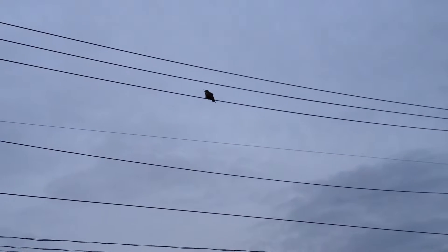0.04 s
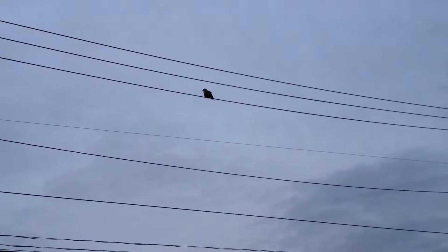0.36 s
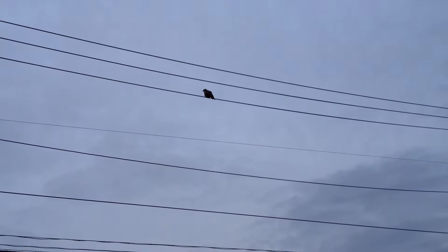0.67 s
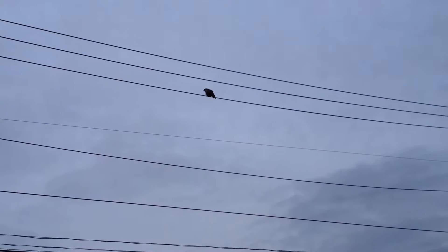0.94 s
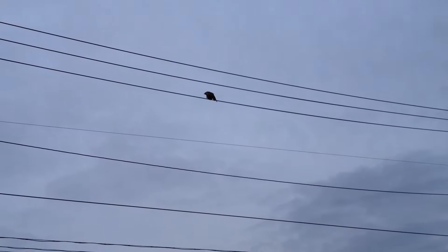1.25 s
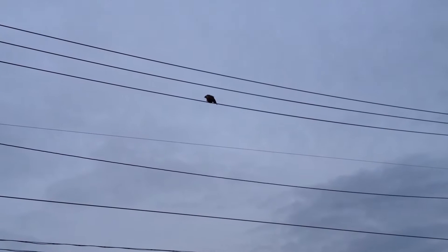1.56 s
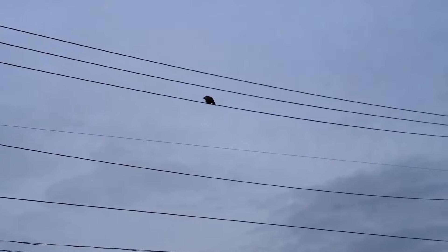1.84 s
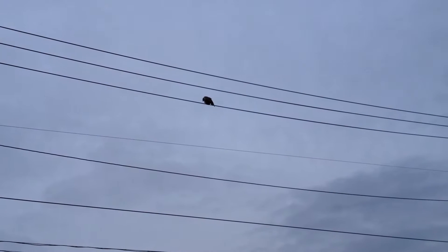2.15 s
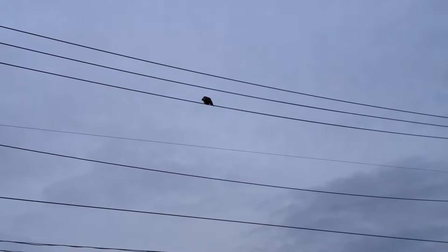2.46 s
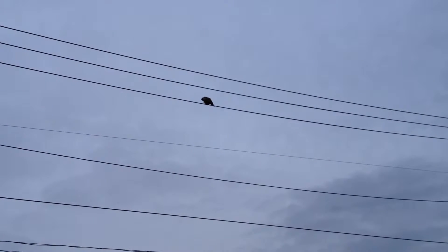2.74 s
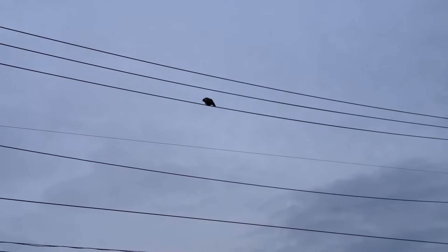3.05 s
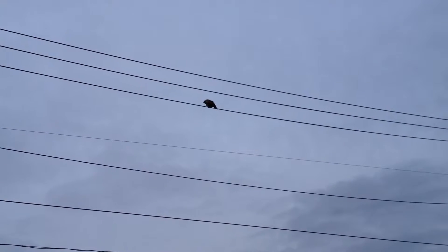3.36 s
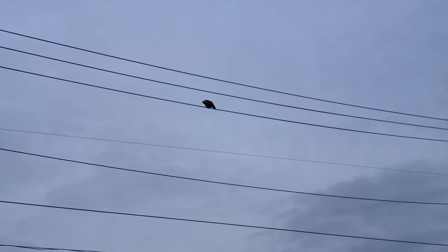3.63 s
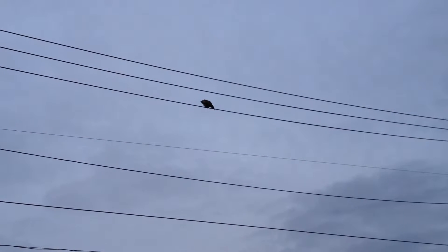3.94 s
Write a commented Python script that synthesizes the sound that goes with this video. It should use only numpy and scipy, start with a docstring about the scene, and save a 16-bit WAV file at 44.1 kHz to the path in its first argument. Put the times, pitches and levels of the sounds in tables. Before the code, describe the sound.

A bird on an overhead wire whistles one long, thin call: an arching slide, then a trill that quickens and fades. It echoes faintly outdoors over rushing traffic and a low engine hum, with two soft wind puffs near the end.

```python
"""Near a road, a bird on an overhead wire whistles one long call: a slide that arches up and down,
then a trill that quickens and fades. At some peaks of the trill its voice flips to a higher register.
The ground and walls echo it. Behind it is the rushing noise of traffic, with a low exhaust drone,
one engine that gently revs and eases off, and a faint tyre whine. Near the end come two soft puffs
of wind. The sound is mono."""
import sys
import numpy as np
from scipy import signal
from scipy.fft import rfft, irfft
from scipy.io import wavfile
from scipy.ndimage import uniform_filter1d

SR = 44100
rng = np.random.default_rng(int(sys.argv[2]) if len(sys.argv) > 2 else 0)


def log_audio(samples):
    """Write samples as a 16-bit WAV file to the path given in sys.argv[1]."""
    # one column per channel
    frames = np.atleast_2d(samples).T
    # limit to full scale, then quantise
    limited = np.clip(frames, -1, 1)
    pcm = np.round(limited * 32767).astype(np.int16)
    wavfile.write(sys.argv[1], SR, pcm)


N = 176400  # 4 seconds

# The six notes of the opening slide, each (time [s], pitch [Hz], level [dB])
CLIMB = [(.74, 2030, -48), (.765, 2165, -44), (.79, 2315, -39), (.813, 2425, -39.5)]
ARCH = [(.814, 2725, -38.5), (.845, 2775, -36.5), (.89, 2900, -37), (.96, 2948, -36), (.995, 2962, -37),
        (1.025, 2945, -34), (1.05, 2910, -35), (1.072, 2830, -35.5), (1.093, 2740, -36.5)]
DIP = [(1.096, 2690, -40), (1.12, 2642, -39.5), (1.139, 2660, -39)]
STEP_UP = [(1.149, 2738, -38.5), (1.192, 2748, -40)]
STEP_DOWN = [(1.195, 2645, -39), (1.231, 2635, -35.5)]
LOW_NOTE = [(1.232, 2220, -37), (1.27, 2220, -40), (1.315, 2245, -38), (1.335, 2262, -39),
            (1.36, 2210, -41), (1.385, 2140, -50)]

def bird_slide(t):
    """The bird's pitch climbs, leaps into a long arch and drops back in steps."""
    notes = [CLIMB, ARCH, DIP, STEP_UP, STEP_DOWN, LOW_NOTE]
    return sum(whistle(t, *curve(note, t)) * gate(t, note[0][0], note[-1][0]) for note in notes)


# Each swing of the trill, from a valley up to a peak
# (peak time [s], valley pitch [Hz], valley level [dB], peak pitch [Hz], peak level [dB])
TRILL_SWINGS = [(1.46, 2197, -49, 2310, -37.5), (1.596, 2205, -42, 2390, -38), (1.71, 2182, -50, 2525, -32),
                (1.827, 2233, -45, 2570, -34), (1.951, 2275, -41, 2580, -35.5),
                (2.053, 2293, -39, 2580, -34), (2.145, 2443, -34, 2545, -39),
                (2.225, 2480, -45, 2590, -37.5), (2.311, 2485, -34, 2535, -36.5),
                (2.394, 2412, -38, 2520, -35), (2.475, 2387, -43, 2526, -32), (2.549, 2420, -37, 2625, -33),
                (2.616, 2470, -45, 2590, -33.5), (2.684, 2464, -38, 2545, -35),
                (2.764, 2440, -36, 2480, -31.5), (2.857, 2405, -36, 2626, -32),
                (2.93, 2405, -39.5, 2520, -33.5), (2.996, 2410, -36, 2480, -36.5),
                (3.075, 2437, -44, 2605, -31.5), (3.13, 2464, -34.5, 2463, -35),
                (3.2, 2412, -36, 2455, -34.5), (3.267, 2403, -36, 2520, -36), (3.336, 2373, -37, 2520, -35),
                (3.397, 2374, -39, 2535, -35.5), (3.46, 2364, -41, 2470, -36.5),
                (3.524, 2324, -50, 2410, -32), (3.585, 2280, -59, 2370, -43), (3.646, 2283, -54, 2370, -42)]
# When the voice flips to its higher register (start [s], end [s])
VOICE_FLIPS = [(1.699, 1.748), (1.817, 1.863), (1.935, 1.986), (2.034, 2.079), (2.465, 2.495)]

def bird_trill(t):
    """Pitch and loudness swing back and forth; on some peaks the voice flips upward."""
    start_s, peak_sharpness = 1.39, 2.1
    flip_hz, flip_db = 481, -1.1
    peak_s, valley_hz, valley_db, peak_hz, peak_db = np.transpose(TRILL_SWINGS)
    valley_s = np.append(start_s, (peak_s[:-1] + peak_s[1:]) / 2)
    turns_s = np.column_stack([valley_s, peak_s]).ravel()
    step = np.interp(t, turns_s, np.arange(len(turns_s)))  # even at valleys, odd at peaks
    peak = (step // 2).astype(int)
    valley = np.minimum((step + 1) // 2, len(peak_s) - 1).astype(int)
    swing = np.sin(np.pi * step / 2) ** 2  # 0 at valleys, 1 at peaks
    hz = valley_hz[valley] + (peak_hz[peak] - valley_hz[valley]) * swing ** peak_sharpness
    gain = amp(valley_db[valley]) * (1 - swing) + amp(peak_db[peak]) * swing
    db = 20 * np.log10(gain)
    low_voice = whistle(t, hz, db)
    high_voice = whistle(t, hz + flip_hz + 20 * drift(207), db + flip_db)  # less steady in pitch
    flipped = sum(gate(t, start, end, edge_s=0.0011) for start, end in VOICE_FLIPS)
    voice = (1 - flipped) * low_voice + flipped * high_voice
    return voice * gate(t, start_s, peak_s[-1])


# Overtones at 2 and 3 times the pitch, compared with the main tone, before the throat shapes them
# (time [s], lower overtone [dB], upper overtone [dB])
OVERTONES = [(.8, -20, -38), (1.0, -21.5, -38), (1.2, -19, -38), (1.45, -29, -42), (1.595, -13, -42),
             (1.69, -29, -42), (1.95, -26.5, -40), (2.2, -34, -44), (2.55, -33, -41), (2.8, -29, -37),
             (3.2, -26, -31), (3.6, -32, -33)]
# How much of an overtone the throat lets through (frequency [Hz], gain [dB])
THROAT_FILTER = [(4980, 0), (5150, -8), (5290, 0), (7450, 0), (7750, -12), (9000, -14)]

def whistle(t, hz, db):
    """The bird's voice: a slightly shaky, nearly pure tone with two faint overtones."""
    pitch_wobble, level_wobble_db, overtone_wobble_db = 0.003, 1.72, 2.5
    phase = phase_of(hz * (1 + pitch_wobble * drift(100)))
    tone = np.sin(phase)
    for multiple, overtone_db in enumerate(curve(OVERTONES, t), 2):
        throat_db = curve(THROAT_FILTER, multiple * hz)[0]
        tone += amp(overtone_db + throat_db + overtone_wobble_db * drift(93)) * np.sin(multiple * phase)
    return np.sqrt(2) * tone * amp(db + level_wobble_db * drift(93))


def street_echo(sound):
    """Sound bounces off the ground and walls and returns as many faint, late copies."""
    echo_db, delay_s, fade_s, bounces_per_s = -15, 0.012, 0.5, 2000
    t = np.arange(SR) / SR
    bounces = rng.standard_normal(SR) * (rng.random(SR) < bounces_per_s / SR)
    bounces *= (t > delay_s) * amp(-60 * t / fade_s)
    return amp(echo_db) * signal.fftconvolve(sound, bounces / np.linalg.norm(bounces))[:N]


# The balance of low and high sound in the road noise (frequency [Hz], relative level [dB])
ROAD_TONE = [(20, -42), (40, -39), (60, -32), (80, -19), (105, -26), (135, -6), (165, -3), (200, 0.5),
             (235, 3), (262, -1), (295, 5), (350, -1.5), (480, -4), (700, -3.5), (850, -0.5), (1100, 0.5),
             (1500, 0.5), (1800, -2.5), (2100, -5), (2600, -7.5), (3200, -10.5), (3800, -14.5), (4650, -15),
             (5200, -25), (6000, -25), (7000, -29), (9000, -35), (11000, -37), (13000, -34), (15200, -35.5)]
# The middles of eight bands of that noise, low to high (frequency [Hz])
ROAD_BANDS = [180, 600, 950, 1400, 1900, 4000, 8000, 13000]
# Each band's ups and downs; only the change from its own average is used
# (time [s], band 1 level [dB], ..., band 8 level [dB])
ROAD_SWELLS = [(0, -41.5, -44.5, -37.5, -34, -42, -48, -62, -58),
               (.27, -41, -41, -34, -35, -40.5, -47, -55.5, -54),
               (.52, -42.5, -39, -33.5, -35, -41, -44, -55, -57.5),
               (.8, -40.5, -40.5, -35.5, -37.5, -39, -46.5, -56.5, -61.5),
               (.97, -40, -42, -34, -40.5, -42.5, -48, -57, -63.5),
               (1.15, -40.5, -42, -33.5, -38.5, -41, -47, -58, -59.5),
               (1.5, -42, -44, -36, -41.5, -42, -49.5, -61, -62.5),
               (1.8, -41.5, -44, -38, -41.5, -42, -50.5, -62, -64.5),
               (2.3, -42, -46.5, -40, -40.5, -42, -51.5, -65.5, -65.5),
               (2.65, -43, -47, -41, -40.5, -43.5, -51.5, -65.5, -65.5),
               (2.8, -40, -46, -42, -39.5, -43, -52.5, -65, -63),
               (3.3, -41, -46, -42, -38.5, -40, -49, -62.5, -62.5),
               (3.58, -40.5, -44, -37, -40.5, -39.5, -47, -57.5, -61),
               (3.78, -39, -42.5, -38.5, -37.5, -41.5, -45.5, -58, -66),
               (4, -39.5, -43.5, -37.5, -42.5, -43, -47.5, -58, -68)]

def traffic():
    """Road noise swells and sinks as vehicles come and go; the treble flickers."""
    level_db, flicker_db = -32.5, 1.54
    patch_s, patch_hz = 0.09, 500
    size, hop = 2048, 512  # the noise is built in short, overlapping slices
    t = np.arange(N // hop + 5) * hop / SR
    hz = np.fft.rfftfreq(size, 1 / SR)
    real, imaginary, patches = rng.standard_normal((3, len(t), len(hz)))
    # Blur random values over time, then frequency, into louder and softer patches of about 1 dB.
    patches = uniform_filter1d(patches, round(patch_s * SR / hop), axis=0)
    patches_db = unit(uniform_filter1d(patches, round(patch_hz * size / SR), axis=1))
    log_hz = np.log(hz + 1)
    tone_hz, tone_db = np.transpose(ROAD_TONE)
    steady_db = np.interp(log_hz, np.log(tone_hz), tone_db)
    bands_db = np.transpose(curve(ROAD_SWELLS, t))
    bands_db -= bands_db.mean(0)
    swell_db = np.array([np.interp(log_hz, np.log(ROAD_BANDS), row) for row in bands_db])
    flicker = np.interp(t, np.arange(N) / SR, drift(36))
    treble = np.interp(hz, [3100, 11000], [0, 1])
    shape_db = steady_db + swell_db + patches_db + flicker_db * np.outer(flicker, treble)
    slices = (real + 1j * imaginary) * amp(shape_db)
    _, noise = signal.istft(slices.T, nperseg=size, noverlap=size - hop)
    return amp(level_db) * unit(noise[:N])


# The low drone of the traffic (time [s], pitch [Hz], level [dB])
EXHAUST_DRONE = [(0, 254.7, -40.5), (.35, 247.9, -48.5), (.9, 258.6, -40.5), (1.25, 256, -39.5),
                 (1.421, 268.5, -35.5), (1.6, 264.5, -42), (1.85, 260, -41), (2.3, 269.7, -39.5),
                 (2.5, 268.5, -51.5), (2.9, 263.6, -44), (3.2, 255.3, -46.5), (3.7, 261.4, -42.5),
                 (4, 284, -38)]

def exhaust_drone(t):
    """Exhausts hum around one low, wandering pitch."""
    return fuzzy_tone(*curve(EXHAUST_DRONE, t), spread_hz=23)


# The engine speeding up and easing off (time [s], firing rate [Hz], base level [dB])
ENGINE_REVS = [(0, 93.6, -59.5), (.55, 98.3, -57.5), (.75, 102.8, -56.5), (1.15, 108.1, -49),
               (1.33, 115.9, -51.5), (1.55, 118.4, -48.5), (1.8, 115.7, -50), (2.05, 111.2, -57),
               (2.35, 112, -51.5), (2.6, 112.9, -61.5), (3.0, 106.5, -56), (3.3, 102.7, -64), (4, 98, -69)]
# Its main tones (multiple of the firing rate, level added to the base [dB])
ENGINE_TONES = [(1, -2), (1.5, -7)]
# Its tone at half the firing rate (time [s], level added to the base [dB])
UNEVEN_FIRING = [(1.0, -30), (1.3, -20), (1.7, -25), (2.1, -30)]

def engine(t):
    """A distant engine hums; working hard makes it fire unevenly, so its deepest tone grows."""
    pitch_wobble, level_wobble_db = 0.0028, 1.6
    firing_hz, base_db = curve(ENGINE_REVS, t)
    phase = phase_of(firing_hz * (1 + pitch_wobble * drift(11.5)))
    tones = ENGINE_TONES + [(0.5, curve(UNEVEN_FIRING, t)[0])]
    return np.sqrt(2) * sum(amp(base_db + db + level_wobble_db * drift(8.4)) * np.sin(multiple * phase)
                            for multiple, db in tones)


# The faint whine in the traffic (time [s], pitch [Hz], level [dB])
TYRE_WHINE = [(0, 791, -51), (0.399, 793, -44.5), (0.651, 819, -37.5), (.9, 845.4, -45), (1.1, 836, -66),
              (1.45, 813, -45), (1.8, 824, -65), (4, 833, -73)]

def tyre_whine(t):
    """Tyres sing on the road, loudest near the start."""
    return fuzzy_tone(*curve(TYRE_WHINE, t), spread_hz=25)


# Puffs of wind (time [s], pitch [Hz], peak level [dB])
WIND_PUFFS = [(3.29, 105, -48), (3.49, 78.1, -52)]

def wind_puffs(t, swell_s=0.02):
    """Each puff is a soft, low bump: a deep tone that swells and is gone at once."""
    return sum(amp(db) * np.exp(-((t - at) / swell_s) ** 2) * np.sin(2 * np.pi * hz * (t - at))
               for at, hz, db in WIND_PUFFS)


def fuzzy_tone(hz, db, spread_hz):
    """Noise packed so closely around one pitch that it sounds like a blurry note."""
    fuzz = drift(spread_hz) + 1j * drift(spread_hz)
    return amp(db) * unit((fuzz * np.exp(1j * phase_of(hz))).real)


def amp(db):
    """Turns decibels into a number to multiply a sound by."""
    return 10 ** (np.asarray(db) / 20)


def unit(x):
    """Scales a signal to an average strength (rms) of 1."""
    return x / np.sqrt(np.mean(abs(x) ** 2) + 1e-20)


def curve(rows, points):
    """Reads a table at points along its first column, joining the rows with straight lines."""
    at, *columns = np.transpose(rows)
    return [np.interp(points, at, column) for column in columns]


def drift(rate_hz):
    """A smooth random wobble of strength 1, moving up to about rate_hz times a second."""
    hz = np.fft.rfftfreq(N, 1 / SR)
    return unit(irfft(rfft(rng.standard_normal(N)) / (1 + (hz / rate_hz) ** 4), N))


def phase_of(hz):
    """How far a wave has turned, in radians, as its pitch changes."""
    return 2 * np.pi * np.cumsum(hz) / SR


def gate(t, start, end, edge_s=0.0025):
    """A soft on-off switch: 1 between start and end, 0 outside."""
    return (np.tanh((t - start) / edge_s) - np.tanh((t - end) / edge_s)) / 2


def scene():
    """The bird and its echo over the road and wind, the same in both channels."""
    t = np.arange(N) / SR
    bird = bird_slide(t) + bird_trill(t)
    road = traffic() + engine(t) + exhaust_drone(t) + tyre_whine(t)
    mix = bird + street_echo(bird) + road + wind_puffs(t)
    return np.array([mix, mix])


def record(dry):
    """Cuts away the very highest treble."""
    low_pass = signal.firwin(801, cutoff=15300, window=("kaiser", 9), fs=SR)
    return signal.oaconvolve(dry, low_pass[None], "same")


dry = scene()
out = record(dry)
log_audio(out)
```